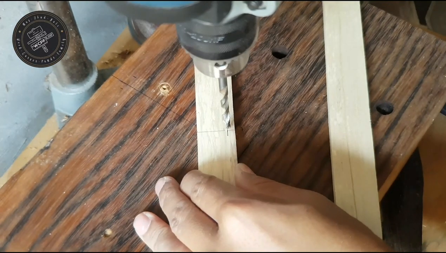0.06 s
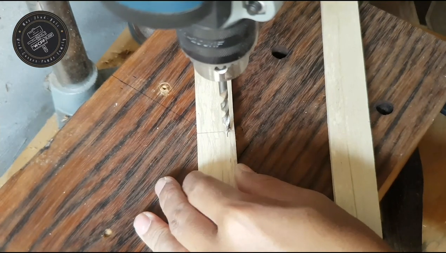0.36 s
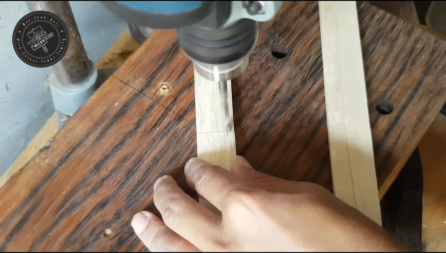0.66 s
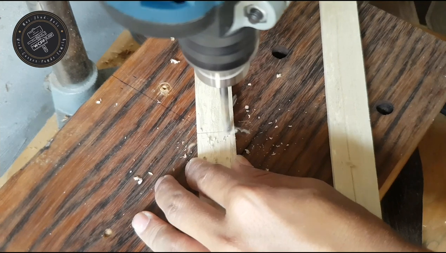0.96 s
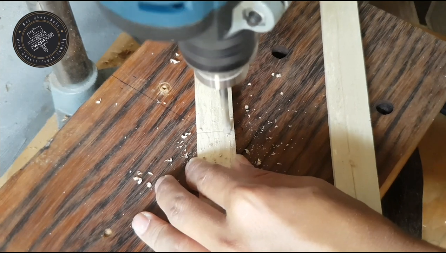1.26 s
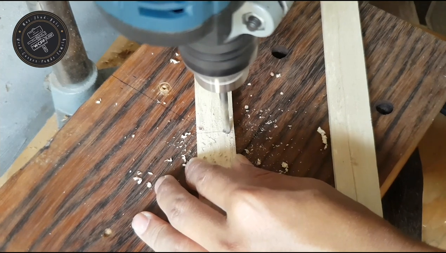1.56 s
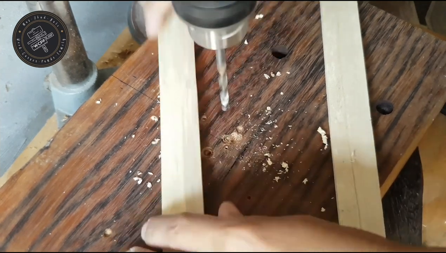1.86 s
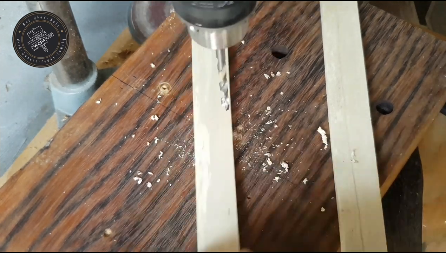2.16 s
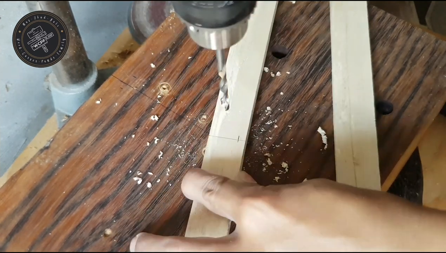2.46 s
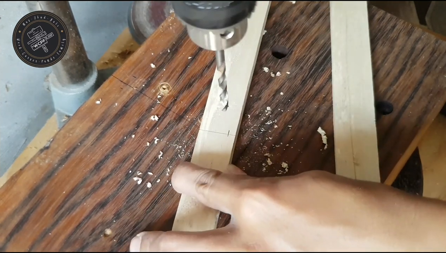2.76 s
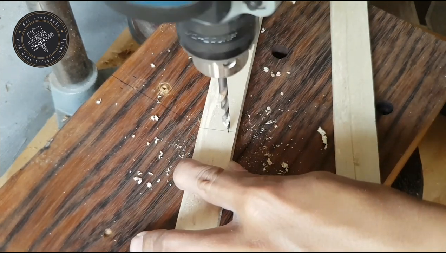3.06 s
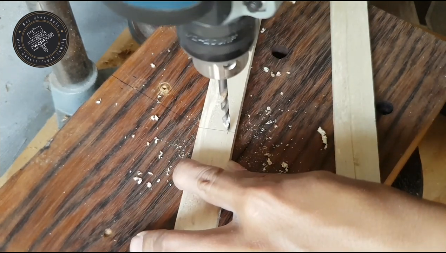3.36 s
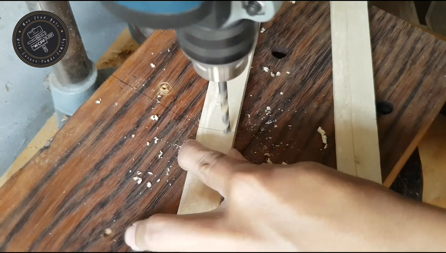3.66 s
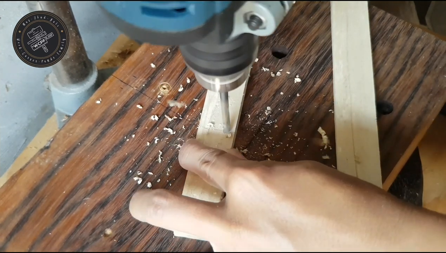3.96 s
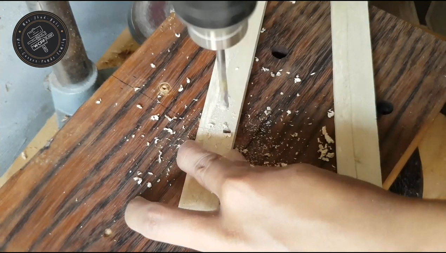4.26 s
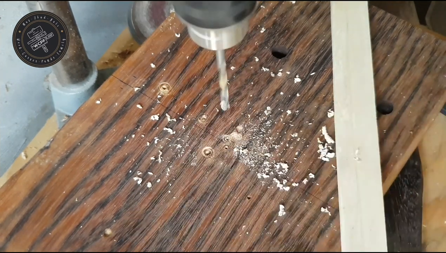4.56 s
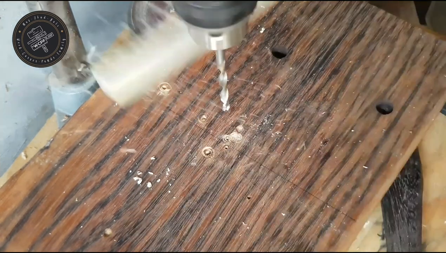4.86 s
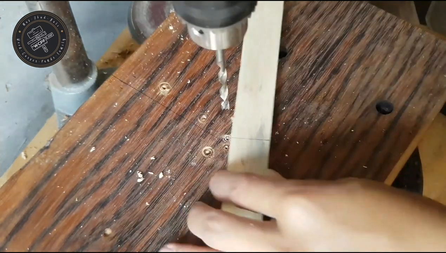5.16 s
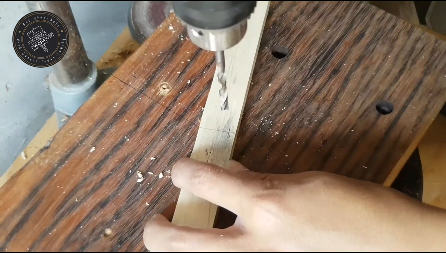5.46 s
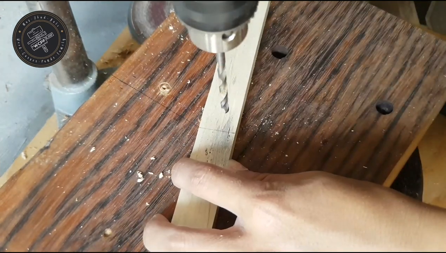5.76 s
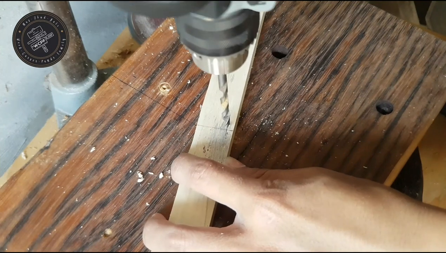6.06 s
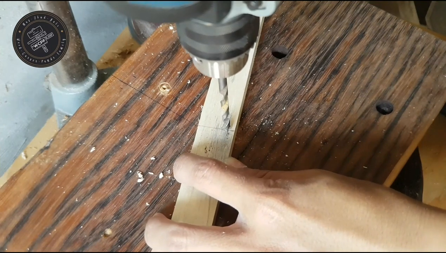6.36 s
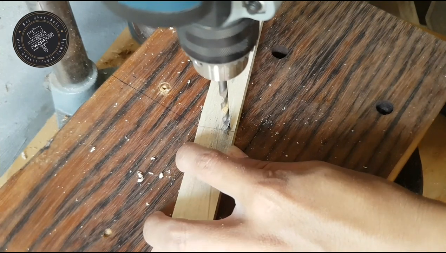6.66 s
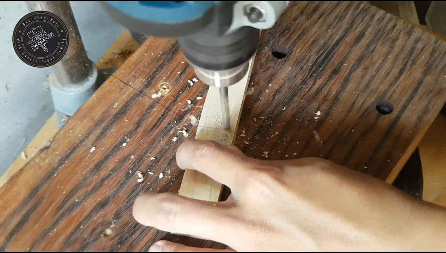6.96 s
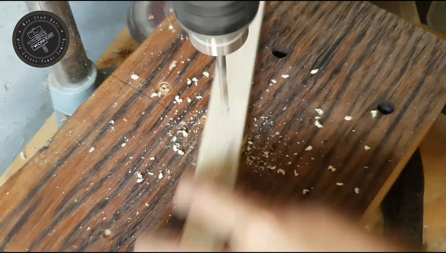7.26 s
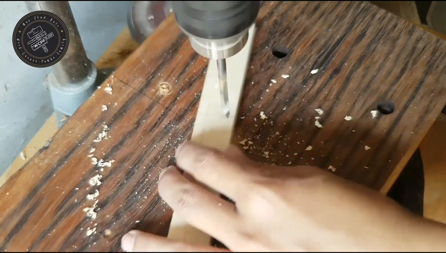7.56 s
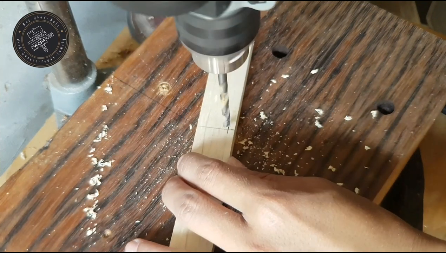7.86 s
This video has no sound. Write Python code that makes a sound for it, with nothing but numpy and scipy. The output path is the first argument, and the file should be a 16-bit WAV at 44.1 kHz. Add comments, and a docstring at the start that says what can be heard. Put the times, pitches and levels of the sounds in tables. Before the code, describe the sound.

An electric drill in a bench stand bores three holes in wood. Each time it starts slowly, jumps to a high whine, crunches briefly through the wood and winds down with rattling gears. Between runs, wood strips slide and squeak faintly on the bench, and the stand judders as it is lowered. A few sharper wooden knocks follow the second hole. The sound is close, in a small, dry workshop.

```python
"""In a small, dry workshop, a mains drill in a bench stand bores three holes in wood strips.
Each time it runs up, sags while the bit crunches through the wood, and coasts down. Tooth impacts make
its gears rattle, its fan rushes, and gears, fan blades and commutator whine at multiples of the rotor speed.
In between, strips slide, squeak and knock on the bench, and the carriage judders down its column."""
import sys
import numpy as np
from scipy import signal
from scipy.fft import rfft, irfft, next_fast_len
from scipy.io import wavfile
from scipy.ndimage import uniform_filter1d

SR = 44100
rng = np.random.default_rng(int(sys.argv[2]) if len(sys.argv) > 2 else 0)


def log_audio(samples):
    """Write samples as a 16-bit WAV file to the path given in sys.argv[1]."""
    # one column per channel
    frames = np.atleast_2d(samples).T
    # limit to full scale, then quantise
    limited = np.clip(frames, -1, 1)
    pcm = np.round(limited * 32767).astype(np.int16)
    wavfile.write(sys.argv[1], SR, pcm)


N = 353241


def from_db(db):
    """Amplitude ratio of a level: a factor of ten per 20 dB."""
    return 10 ** (np.asarray(db) / 20)


def rms_one(x):
    """Normalisation to unit mean power."""
    return x / np.sqrt(np.mean(x ** 2) + 1e-20)


def ramp(x, span):
    """Linear rise from 0 to 1 over a span, then saturation."""
    return np.clip(x / span, 0, 1)


def colour(x, spectrum, share=1):
    """Spectral shaping by a gain curve interpolated on a log-frequency axis."""
    size = next_fast_len(N + SR // 10)
    hz = np.arange(size // 2 + 1) * SR / size
    curve_hz, curve_db = np.transpose(spectrum)
    gain_db = np.interp(np.log(hz + 1), np.log(curve_hz), curve_db)
    return irfft(rfft(x, size) * from_db(share * gain_db), size)[..., :N]


def noise(spectrum):
    """Diffuse field: coloured noise of unit rms, uncorrelated between the channels."""
    return rms_one(colour(rng.standard_normal((2, N)), spectrum))


def drift(hz):
    """Random fluctuation: low-passed noise of unit rms."""
    step, run_in = 40, 2000
    r = np.exp(-2 * np.pi * hz * step / SR)
    slow = signal.lfilter([1], [1, -2 * r, r * r], rng.standard_normal(N // step + run_in + 2))[run_in:]
    return np.interp(np.arange(N) / step, np.arange(len(slow)), rms_one(slow))


def ring(x, hz, t60):
    """Damped oscillator: a unit impulse excites a decaying sine of amplitude 1."""
    r, w = from_db(-60 / (t60 * SR)), 2 * np.pi * hz / SR
    return signal.lfilter([0, np.sin(w)], [1, -2 * r * np.cos(w), r * r], x + 1e-18)


def resonate(x, peaks):
    """Resonances and antiresonances in series."""
    for hz, q, db in peaks:
        w, a = 2 * np.pi * hz / SR, from_db(db / 2)
        k, middle = np.sin(w) / (2 * q), -2 * np.cos(w)
        x = signal.lfilter([1 + k * a, middle, 1 - k * a], [1 + k / a, middle, 1 - k / a], x)
    return x


def scatter(x, t60):
    """Reverberation: convolution with a decaying noise tail of unit energy in each channel."""
    t = np.arange(int(t60 * SR) + 2) / SR
    tail = rng.standard_normal((2, len(t))) * from_db(-60 * t / t60)
    tail /= np.sqrt(np.sum(tail ** 2, axis=1, keepdims=True))
    return signal.fftconvolve(np.atleast_2d(x), tail, axes=1)[:, :N]


def bursts(strikes, t60):
    """Impact noise: the energy of each strike decays exponentially."""
    r = from_db(-120 / (t60 * SR))
    power = signal.lfilter([1], [1, -r], strikes ** 2 + 1e-18) * (1 - r)
    return np.sqrt(power) * rng.standard_normal((2, N))


# spectrum of the quiet workshop: f/Hz, relative level/dB
ROOM_SPECTRUM = [(29, -32.5), (50, 4.5), (884, -7), (2010, -11.5), (2160, -9), (2320, -12.5), (16000, -34)]

def room_noise(db):
    """Ambient noise: a diffuse field whose level wavers slightly."""
    return from_db(db + 1.7 * drift(8)) * noise(ROOM_SPECTRUM)


def handling(per_s, db):
    """Poisson process: fingers and loose chips give faint, dull touches at random times."""
    touches = (rng.random(N) < per_s / SR) * from_db(2 * np.clip(rng.standard_normal(N), -1, 1))
    dull = [(100, -14), (400, 4.5), (1800, -2), (4000, -15), (12000, -38)]   # f/Hz, gain/dB
    return from_db(db) * rms_one(colour(bursts(touches, t60=0.15), dull))


# dry rubbing: t/s, duration/s, start f/Hz, end f/Hz, relative level/dB, step per overtone/dB
SQUEAK_GLIDES = [(2.276, 0.085, 626, 607, -55, -22), (2.467, 0.068, 623, 680, -54, -11),
                 (2.522, 0.061, 1900, 1700, -47.5, -29), (2.554, 0.11, 810, 683, -50.5, -8),
                 (2.691, 0.093, 657, 833, -49.5, -8), (3.395, .06, 2200, 2360, -49, -33),
                 (3.445, 0.053, 755, 610, -40, -23), (3.717, 0.12, 954, 883, -47, -21),
                 (5.145, 0.058, 442, 431, -40.5, -11), (5.205, 0.122, 587, 672, -53, -19),
                 (5.941, 0.1, 3270, 2620, -55, -29)]

def squeaks(roughness):
    """Stick-slip oscillation: friction sustains short, wavering tones of three harmonics."""
    out, waver = np.zeros(N), drift(120)
    for s, length, start_hz, end_hz, db, overtone_db in SQUEAK_GLIDES:
        at = int(s * SR) + np.arange(int(length * SR))
        hz = np.linspace(start_hz, end_hz, len(at)) * (1 + roughness * waver[at])
        phase = 2 * np.pi * np.cumsum(hz) / SR
        tone = sum(from_db(overtone_db * k) * np.sin((k + 1) * phase) for k in range(3))
        out[at] += from_db(db) * signal.windows.tukey(len(at)) * tone
    return from_db(1.0) * scatter(out, t60=.006)


# modes of strip and bench top: f/Hz, relative level/dB, T60/s
WOOD_MODES = [(130, -17, 0.11), (366, -8.5, 0.062), (556, -0.5, 0.041), (717, -11.5, 0.035),
              (1085, -3, 0.019), (1315, -2.5, 0.0085), (2000, 7, 0.0046), (2340, -4, 0.038),
              (3440, -10, 0.011), (6970, 0, 0.027)]
# wood landing on wood: t/s, level/dB, upper f/Hz of the force, contact time/s
WOOD_IMPACTS = [(2.283, -48, 802, 0.007), (2.333, -47, 1490, 0.0044), (2.468, -51.5, 1800, 0.0093),
                (2.767, -55, 3000, 0.0039), (4.818, -40, 1494, 0.0086), (4.888, -23.5, 1420, 0.0076),
                (4.977, -29, 450, 0.006), (5.033, -29, 2780, 0.0083), (5.135, -34, 1660, 0.01),
                (5.16, -56, 516, 0.026), (5.649, -43.5, 1470, 0.023), (5.789, -50, 1800, .01),
                (5.969, -52.5, 2000, 0.0066), (6.353, -56, 1200, 0.008), (6.42, -55, 2000, 0.0076)]

def knocks(crack_db):
    """Modal excitation: a strip lands in a chatter of contacts; a harder landing reaches higher modes."""
    out, t = np.zeros((2, N)), np.arange(SR // 4) / SR
    for s, db, upper_hz, contact_s in WOOD_IMPACTS:
        chatter = rng.standard_normal((2, len(t))) * np.sqrt(t) * np.exp(-(t / contact_s) ** 2 / 2)
        force = signal.sosfilt(signal.butter(2, [120, upper_hz], "band", fs=SR, output="sos"), chatter)
        modes = sum((-1) ** k * from_db(mode_db) * ring(force, hz, t60)
                    for k, (hz, mode_db, t60) in enumerate(WOOD_MODES))
        knock = from_db(crack_db) * force + modes
        peak_rms = np.sqrt(uniform_filter1d(np.mean(knock ** 2, axis=0), SR // 100).max())
        out[:, int(s * SR):int(s * SR) + len(t)] += from_db(db) * knock / peak_rms
    return out


# strips pushed over the bench: t/s, duration/s, relative body level/dB, relative scrape level/dB
PUSHES = [(2.275, 0.11, -59.5, -68), (2.32, 0.099, -69, -60.5), (2.452, 0.098, -54, -63.5),
          (2.479, 0.43, -60.5, -75.5), (4.983, 0.037, -43, -34.5), (5.042, 0.056, -50, -57),
          (5.09, 0.057, -50.5, -44.5), (5.113, 0.23, -57, -60.5), (5.273, 0.34, -63.5, -73.5),
          (5.597, 0.054, -69, -67.5), (5.65, 0.23, -61, -76), (5.862, 0.26, -63, -73.5),
          (6.235, 0.27, -68, -94)]
# spectra of the low body and the bright scrape: f/Hz, relative level/dB
BODY_SPECTRUM = [(71, -19), (120, -2.5), (261, -7.5), (668, -8.5), (950, -16.5), (1810, -19), (2810, -27.5),
                 (4000, -52), (5200, -56), (8800, -120)]
SCRAPE_SPECTRUM = [(880, -33.5), (1500, -5.5), (2910, -9.5), (3310, -5), (3620, -9), (4200, -4),
                   (16000, -36.5)]
# resonances of a scraped strip: f/Hz, Q, gain/dB
STRIP_RESONANCES = [(1900, 12, 3), (3340, 36, 7), (4140, 36, -3)]

def slides():
    """Sliding friction: wood grain catches unevenly and modulates the noise of a pushed strip."""
    body, scrape = np.zeros((2, N))
    for s, length, body_db, scrape_db in PUSHES:
        at = int(s * SR) + np.arange(int(length * SR))
        push = signal.windows.tukey(len(at), .6)
        body[at] += from_db(body_db + 4.0) * push
        scrape[at] += from_db(scrape_db + 1.5) * push
    grain = from_db(2.3 * drift(56))
    return grain * (body * noise(BODY_SPECTRUM)
                    + scrape * resonate(noise(SCRAPE_SPECTRUM), STRIP_RESONANCES))


# rubbing as the carriage is fed down, harder and harder: t/s, relative level/dB
FEED_CURVE = [(2.97, -65.5), (3.02, -60.5), (3.37, -56), (3.43, -47), (3.76, -43), (3.82, -38.5)]
# it sticks and lurches: t/s, duration/s, relative level/dB
FEED_LURCHES = [(3.37, 0.14, -43), (3.505, 0.099, -40), (3.618, 0.16, -40.5)]
# spectra of the shaking stand and the rubbed column: f/Hz, relative level/dB
STAND_SPECTRUM = [(18, -55), (30, -19.5), (58, -15), (107, -12.5), (155, -2.5), (220, -9), (290, -36),
                  (480, -120)]
COLUMN_SPECTRUM = [(180, -41.5), (300, -5.5), (645, -3), (1300, -7.5), (4300, -22), (6960, -25.5),
                   (9200, -39), (12500, -36.5), (16000, -45.5)]

def carriage(motor_shake, tremble_db):
    """Forced vibration: the carriage rubs down the column; its judder and the motor drive the stand."""
    feed_s, feed_db = np.transpose(FEED_CURVE)
    rub = from_db(np.interp(np.arange(N) / SR, feed_s, feed_db, left=-120, right=-120))
    judder = from_db(tremble_db) * ramp(rub, from_db(-56.5))
    for s, length, db in FEED_LURCHES:
        at = int(s * SR) + np.arange(int(length * SR))
        judder[at] += from_db(db) * np.hanning(len(at))
    stand = rms_one(resonate(noise(STAND_SPECTRUM), [(155.9, 12.0, 8)]))
    return (from_db(4.5) * judder + motor_shake) * stand + from_db(2.0) * rub * noise(COLUMN_SPECTRUM)


TOP_SPEED_HZ, CREEP_HZ = 383, 106   # rotor at full and at half trigger
CLATTER_KNEE_HZ = 58.7   # below this speed the clatter falls away
START_S, UNLOAD_S, RECOVER_S = 0.022, 0.02, 0.055
DRAG_SHARE, DRAG_S, FRICTION_POWER = 0.141, 0.065, 1.362
# trigger: half pressed t/s, pressed home t/s, run-up time/s, released t/s, coasting time/s
TRIGGER_RUNS = [(0.635, 0.8, 0.051, 1.398, 0.952), (3.788, 3.902, 0.034, 4.14, 1.008),
                (6.856, 6.972, 0.026, 7.213, 1.016)]
# one hole a run: bearing down t/s, breakthrough t/s, share of speed lost, hardness 0-1, shake level/dB
BORED_HOLES = [(0.64, 1.189, 0.24, 0.8, -43.5), (3.797, 4.066, 0.043, 0.95, -41),
               (7.08, 7.089, 0.054, 0.8, -45)]

def motor():
    """Speed under load: the rotor creeps, runs up, sags in the cut, recovers and coasts to rest."""
    t = np.arange(N) / SR
    speed, load, shake = np.zeros((3, N))
    creep = CREEP_HZ * (1 + 0.04 * drift(12))   # the motor hunts at half trigger
    for trigger, hole in zip(TRIGGER_RUNS, BORED_HOLES):
        on, home, run_up, off, coast = trigger
        bears, through, sag, hardness, shake_db = hole
        powered, coasting = np.minimum(t, off), np.maximum(t - off, 0)
        start = 1 - np.exp(-np.maximum(t - on, 0) / START_S)
        free = TOP_SPEED_HZ + (creep - TOP_SPEED_HZ) * np.exp(-np.maximum(powered - home, 0) / run_up)
        cut = 1 - sag * np.exp(-np.maximum(powered - through, 0) / RECOVER_S)
        # fan drag takes a share of the speed quickly, friction the rest along a power curve
        remaining = 1 - ramp(coasting, coast)
        drag = DRAG_SHARE * np.exp(-coasting / DRAG_S) * (remaining > 0)
        friction = (1 - DRAG_SHARE) * remaining ** FRICTION_POWER
        run = start * free * cut * (friction + drag)
        speed += run
        biting = ramp(t - home, 1.4 * run_up) * (1 - ramp(t - through, UNLOAD_S))
        load += hardness * ramp(1 - run / TOP_SPEED_HZ, 0.25) * biting   # full load at 25 % lag
        settling = from_db(shake_db - 14 * coasting)   # 14 dB/s after release
        shake += settling * ramp(t - bears, START_S) * ramp(run, CLATTER_KNEE_HZ / 2)
    return speed, np.clip(load, 0, 1), shake


def drill_gain(speed):
    """Incoherent sources add in power: gear clatter dominates at low speed, fan rush at high speed."""
    speed = speed + 1e-3
    rush = from_db(-21 + 38 * np.log10(speed / TOP_SPEED_HZ))
    clatter = from_db(-34) / np.sqrt(1 + (CLATTER_KNEE_HZ / speed) ** 4)
    return np.hypot(rush, clatter)


def chips(load, per_s, uneven_db):
    """Fracture noise: fibres snap under the cutting edges at a rate proportional to the load."""
    snaps = rng.random(N) < per_s * load / SR
    sizes = rms_one(from_db(uneven_db * np.minimum(rng.exponential(1, N), 4)))
    return bursts(snaps * sizes * np.sqrt(SR / per_s), t60=0.0033)


def gear_rattle(speed, turns, uneven_db, ring_db, teeth=4):
    """Backlash: the pinion's teeth strike either flank; each impact cracks and rings the gearbox."""
    meets = np.diff(np.floor(teeth * turns), prepend=0) > 0
    force = rms_one(from_db(uneven_db * np.clip(rng.standard_normal(N), -2, 2)))
    flank = np.where(rng.random(N) < .36, -1, 1)
    strikes = meets * force * flank * np.sqrt(SR / (teeth * speed + 20))
    return bursts(strikes, t60=0.0059) + from_db(ring_db) * scatter(strikes, t60=.05)


CUTOFF_HZ = 15800
# partials: order (rounded in use), relative level/dB when slow, when fast, when cutting
# 1 is rotor imbalance, 4 to 20 the pinion mesh, 39 the fan blades, multiples of 24 the commutator bars
ROTOR_ORDERS = [ (1, -29.5, -32, -23.5), (4, -18.5, -16, -15.5), (8, -22.5, -27, -29),
                (20, -30.5, -33.5, -20.5), (12, -27, -27, -5), (24, -14, -33, -24), (39, -26, -18, -20),
                (48, -22.5, -37.5, -23.5), (72.14, -30.5, -39.5, -44.5)]
# resonances of the housing: f/Hz, bandwidth/Hz, gain/dB
HOUSING_RESONANCES = [(357, 130, 9), (1090, 260, 5), (1524, 130, 4), (2290, 340, 10.5), (3690, 400, 5),
                      (15100, 460, 6.5)]

def whine(speed, turns, fast, load, flutter_db, twist_rad, meshing_s):
    """Rotational harmonics: each order swells as it sweeps through a resonance of the housing."""
    out = np.zeros((2, N))
    angle = 2 * np.pi * turns + twist_rad * drift(45)   # shaft torsion blurs the high orders
    # after a start the gears rattle in their play before they settle into a tone
    r = np.exp(-1 / (meshing_s * SR))
    meshed = signal.lfilter([1 - r], [1, -r], speed > 0)
    strength = ramp(speed, 90) ** 2 * meshed   # near standstill the tones die before the rattle
    loose_db = flutter_db * (1 - 0.25 * load)   # the cut steadies the rotor in its play
    for multiple, slow_db, fast_db, cutting_db in ROTOR_ORDERS:
        order = np.round(multiple)
        hz = order * speed
        free_db = slow_db + fast * (fast_db - slow_db)
        swell_db = sum(db / (1 + (2 * (hz - centre) / width) ** 2)
                       for centre, width, db in HOUSING_RESONANCES)
        gain = strength * from_db(free_db + load * (cutting_db - free_db) + swell_db) * (hz < CUTOFF_HZ)
        for channel in out:
            channel += gain * from_db(loose_db * drift(55)) * np.sin(order * angle + drift(13))
    return out


# resonances and notches of the casing: f/Hz, Q, gain/dB
CASING_RESONANCES = [(283, 7.3, 5.5), (372, 13, 3.5), (1200, 2.7, 2.5), (1440, 23, 4.5), (4400, 7.8, -1.5),
                     (7380, 5.4, 5.5), (9200, 2.8, -11.5)]
# colour of the machine at high and at low speed: f/Hz, gain/dB
FAST_SPECTRUM = [(120, -39), (200, -17.5), (380, -13), (635, -9.5), (1120, -1), (1450, -6), (1590, -2.5),
                 (3370, -5.5), (7410, -11), (9230, -8), (14300, -17), (16000, -26.5)]
SLOW_SPECTRUM = [(120, -41), (200, -13.5), (373, -2.5), (538, -4.5), (635, -8.5), (1210, -2), (1620, -4),
                 (2330, -4.5), (7410, -18), (8740, -20.5), (12400, -20), (16000, -43)]

def drill(speed, load):
    """Source and filter: fan, gears and chips excite the casing under the whine; speed sets the colour."""
    turns = np.cumsum(speed * (1 + .0008 * drift(20))) / SR
    fast = ramp(speed / TOP_SPEED_HZ - .3, .5)
    fan = from_db(-1.5 + 1.9 * fast) * rng.standard_normal((2, N))
    rattle = from_db(-7) * gear_rattle(speed, turns, uneven_db=5.0, ring_db=4.5)
    crunch = from_db(-14) * chips(load, per_s=350, uneven_db=6.0)
    drive = (fan + rattle + crunch) * (speed > 0)
    chuck_turns = turns / 8.2   # the chuck presses the gears once a turn
    drive *= from_db(0.42 * np.sin(2 * np.pi * chuck_turns) + 0.11 * drift(30))
    highpass = signal.butter(2, 190, "high", fs=SR, output="sos")
    casing = signal.sosfilt(highpass, resonate(drive, CASING_RESONANCES))
    fast_body = from_db(-.5) * rms_one(colour(casing, FAST_SPECTRUM))
    gear_ring = [(4510, 3.6, 3.9)]   # slow teeth ring the gears
    slow_body = from_db(-2.5) * rms_one(resonate(colour(casing, SLOW_SPECTRUM), gear_ring))
    body = np.sqrt(fast) * fast_body + np.sqrt(1 - fast) * slow_body
    tones = from_db(6.5) * whine(speed, turns, fast, load, flutter_db=4.0, twist_rad=0.042, meshing_s=0.08)
    return drill_gain(speed) * (body + tones)


# left channel minus right: f/Hz, level difference/dB
STEREO_BALANCE = [(150, 1.5), (500, 0), (1300, 1.5), (3000, 1), (5500, 0.5), (9000, -1), (13000, 6.5)]

def scene():
    """Superposition: close sources, their weak reverberation and the ambient noise add."""
    speed, load, shake = motor()
    direct = drill(speed, load) + carriage(shake, tremble_db=-51.5)
    direct += slides() + knocks(crack_db=26.0) + squeaks(roughness=0.08) + handling(per_s=9, db=-72)
    in_room = direct + from_db(-16) * scatter(direct, t60=.2)
    return colour(in_room, STEREO_BALANCE, share=np.array([[.5], [-.5]])) + room_noise(db=-64)


def record(dry):
    """Band limiting: a steep elliptic low-pass removes the highest treble."""
    return signal.sosfilt(signal.ellip(12, .1, 90, CUTOFF_HZ, fs=SR, output="sos"), dry)


dry = scene()
out = record(dry)
log_audio(out)
```